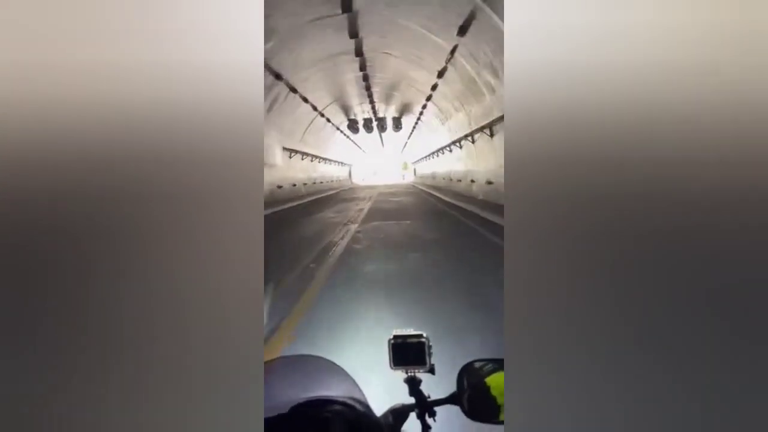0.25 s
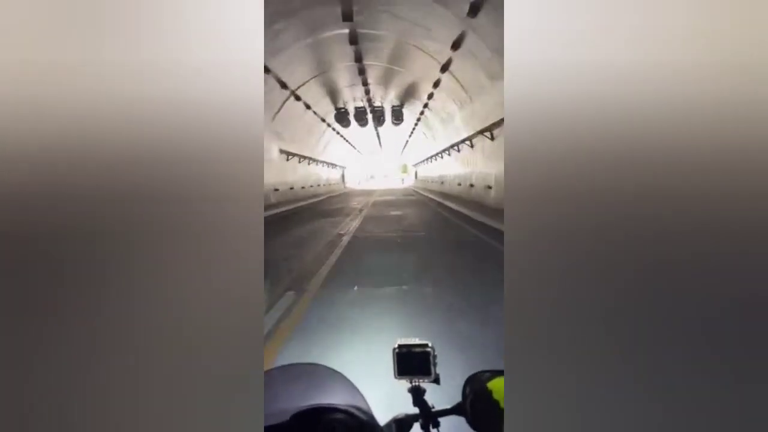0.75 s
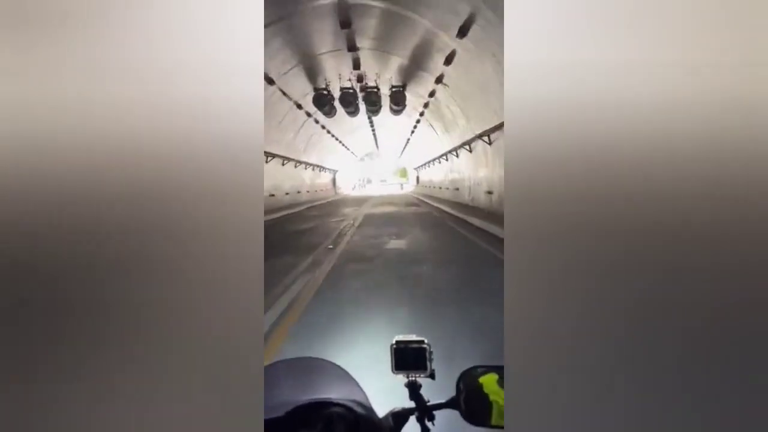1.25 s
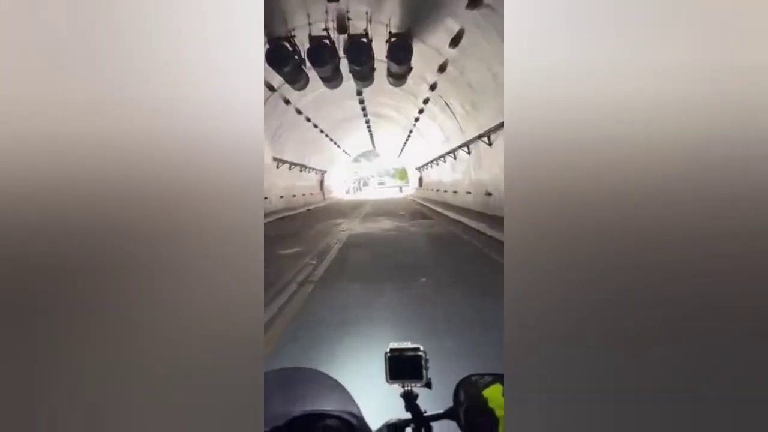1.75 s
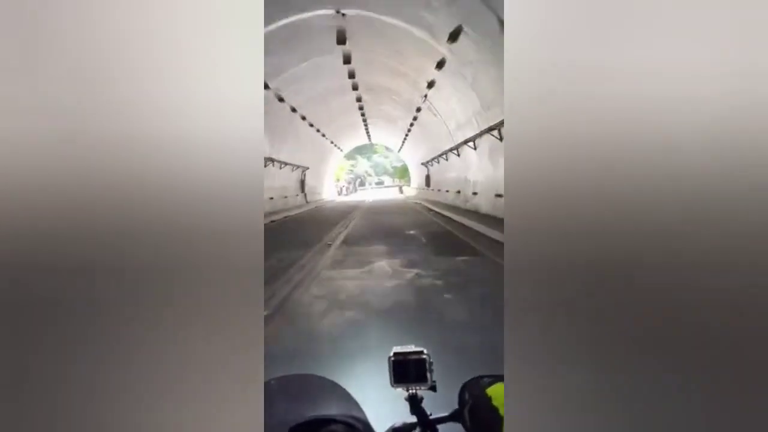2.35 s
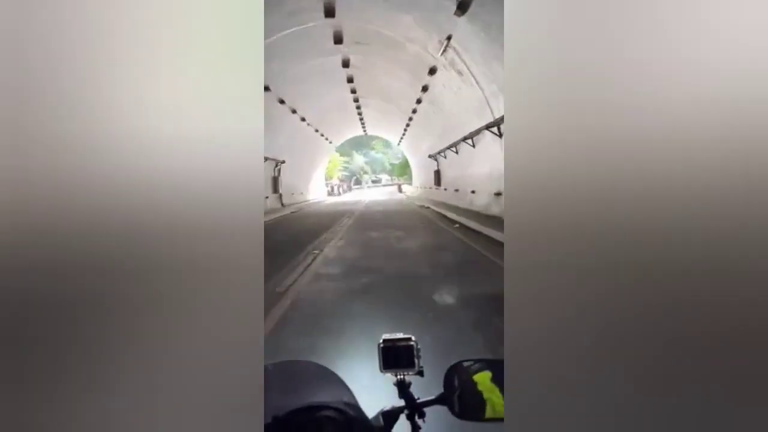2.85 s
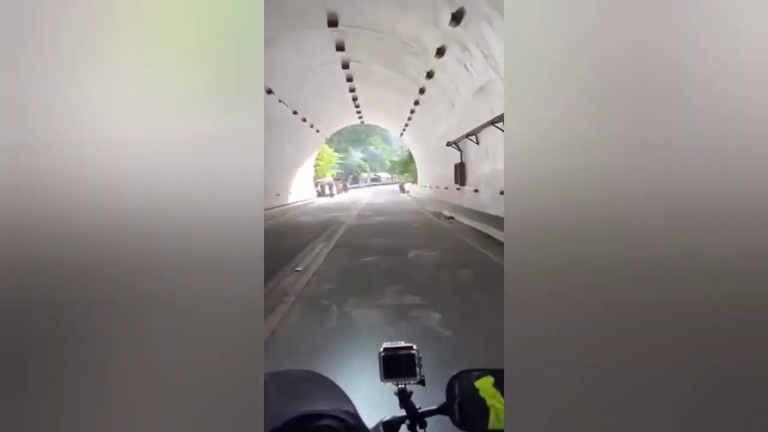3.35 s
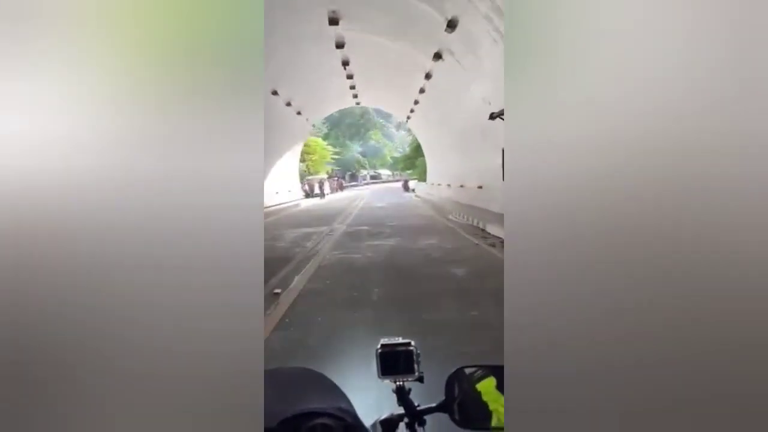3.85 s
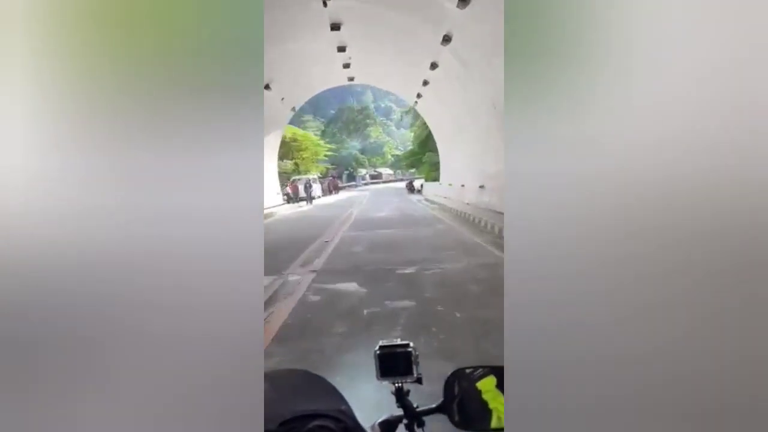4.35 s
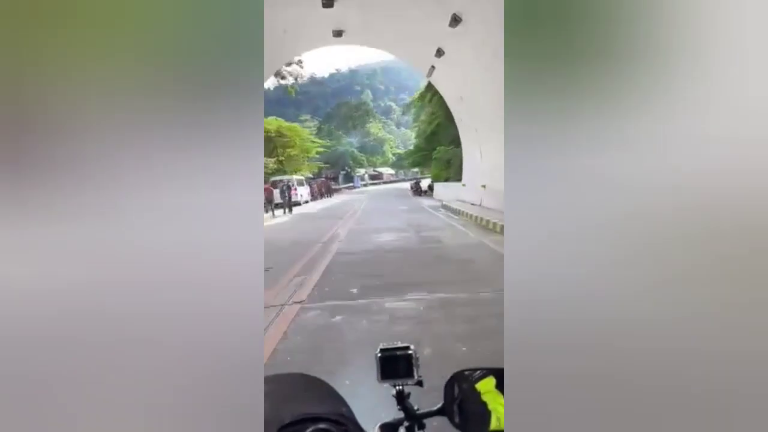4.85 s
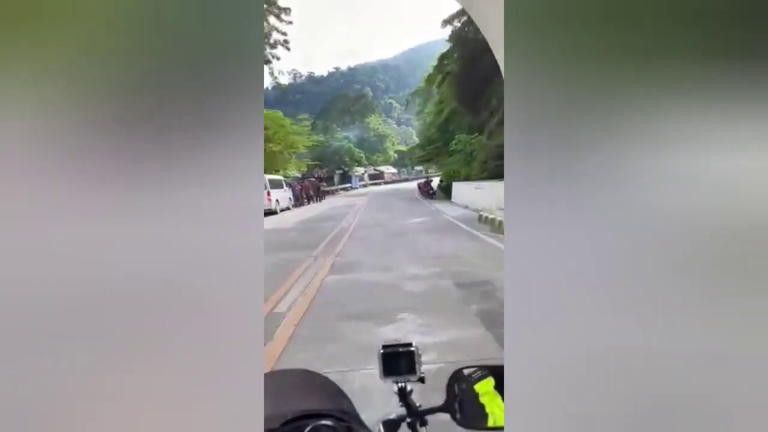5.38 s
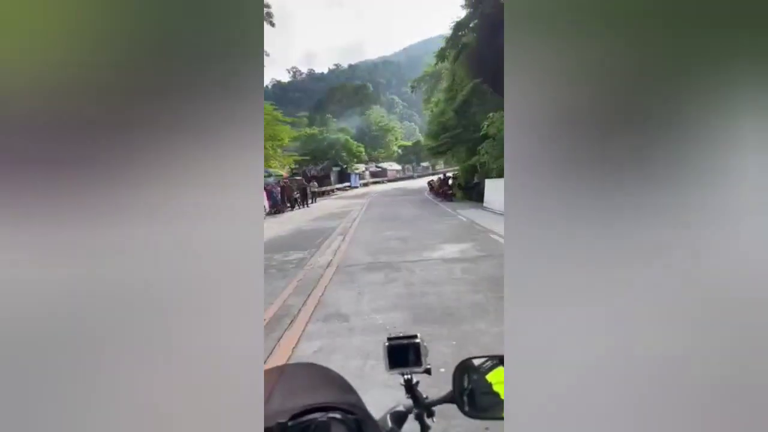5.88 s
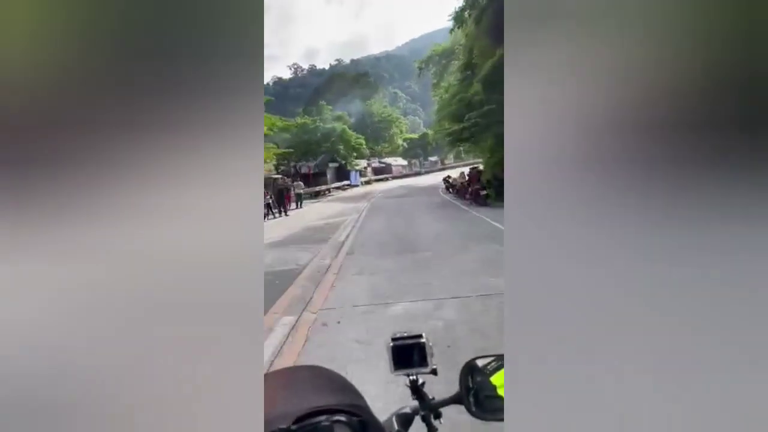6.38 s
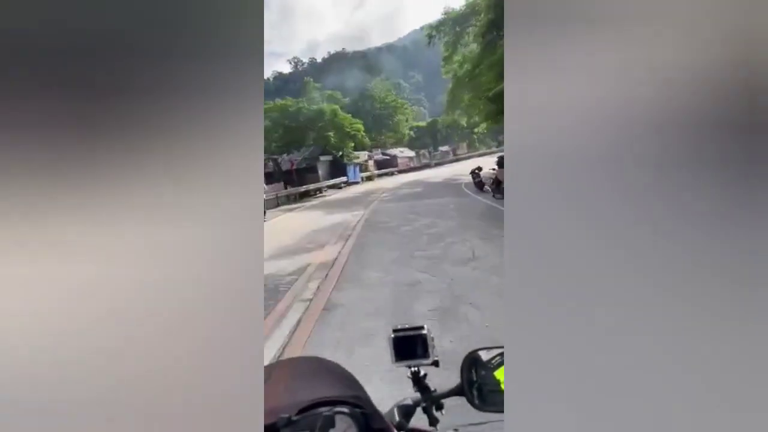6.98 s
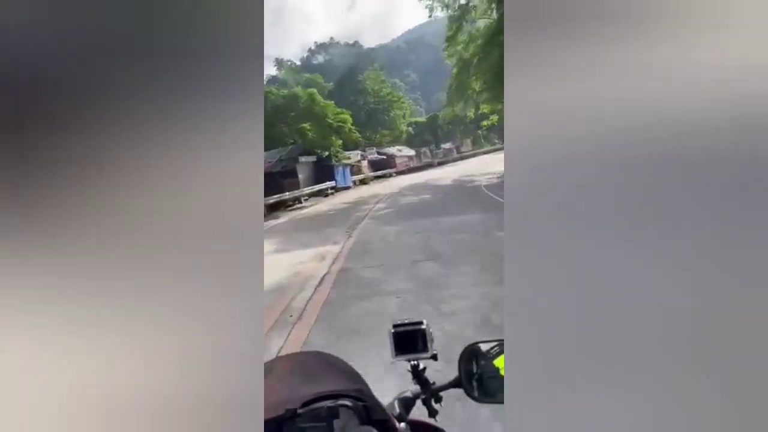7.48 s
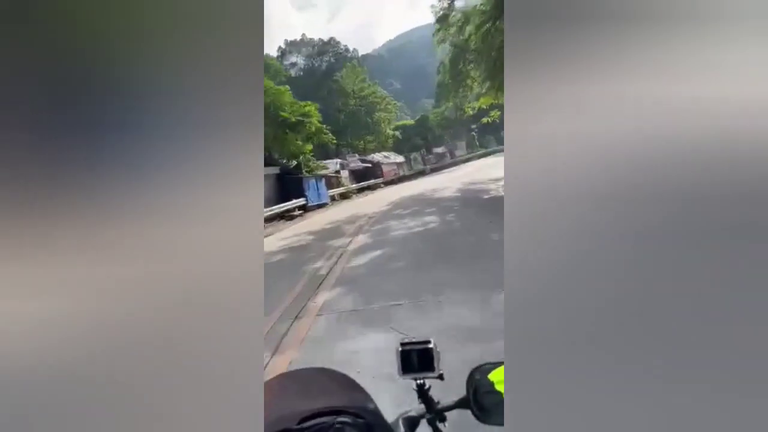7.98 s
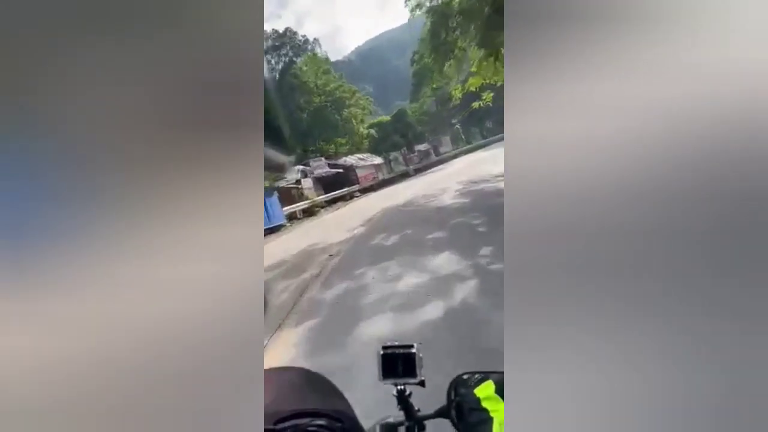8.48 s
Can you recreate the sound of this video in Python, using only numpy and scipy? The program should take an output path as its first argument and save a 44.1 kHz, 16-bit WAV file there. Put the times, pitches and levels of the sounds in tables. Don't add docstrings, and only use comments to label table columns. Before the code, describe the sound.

From the saddle, a motorcycle's high engine howl rings off tunnel walls, falls to quiet wind and rattles, blips, screams again outside, then winds down.

```python
import sys
import numpy as np
from scipy import signal
from scipy.fft import rfft, irfft, next_fast_len
from scipy.io import wavfile
from scipy.ndimage import uniform_filter1d, map_coordinates

SR = 44100
rng = np.random.default_rng(int(sys.argv[2]) if len(sys.argv) > 2 else 0)


def boost(x):
    u = np.asarray(x, float) / 20
    return 10 ** u


def wrap_up_sound(samples):
    columns = np.atleast_2d(samples).T
    tamed = np.clip(columns, -1, 1)
    steps = np.round(tamed * 32767).astype(np.int16)
    wavfile.write(sys.argv[1], SR, steps)


N = 384993

PORTS = np.array([[.5], [-.5]])


def unit(x):
    return x / np.sqrt(np.mean(x ** 2) + 1e-20)


def along(points, hz):
    f, v = np.transpose(points)
    return np.interp(np.log(hz + 1), np.log(f + 1), v)


def curves(rows):
    s, *cols = np.transpose(rows)
    return [np.interp(np.arange(N) / SR, s, c) for c in cols]


def wobble(rate):
    coarse = np.arange(0, N + 64, 64)
    knots = rng.standard_normal(int(N * rate / SR) + 4)
    return np.interp(np.arange(N), coarse, map_coordinates(knots, [coarse * rate / SR]))


def during(spans):
    t = np.arange(N) / SR
    return sum(np.clip((t - a) / .02 + .5, 0, 1) * np.clip((b - t) / .03 + .5, 0, 1) for a, b, *_ in spans)


def span_db(spans):
    return sum(db * during([(a, b)]) for a, b, db in spans)


def bump_db(events):
    return span_db([(s, s + length, db) for s, length, db in events])


def blurred(x, bins, frames):
    return uniform_filter1d(uniform_filter1d(x, size=bins, axis=-2), size=frames, axis=-1)


def filtered(x, response):
    m = 2 * next_fast_len(N // 2 + SR // 4)
    return irfft(rfft(x, m) * response(np.fft.rfftfreq(m, 1 / SR)), m)[..., :N]


def resonance(f, centre_hz, width_hz):
    return 1j * f * width_hz / (centre_hz ** 2 - f * f + 1j * f * width_hz)


def causal(points):
    def response(hz):
        cep = irfft(np.log(boost(along(points, hz))))
        cep[1:len(hz) - 1] *= 2
        cep[len(hz):] = 0
        return np.exp(rfft(cep))
    return response


def tone(order, fired):
    return np.sin(np.pi / 2 * order * fired - np.arctan(order - 4) * 1.6 + .3 * wobble(18))


# pitch_hz, level_db
VOICE = [(120, -10), (215, -15), (300, -7), (380, 4), (490, 0), (640, -10.5), (870, -14), (1700, -28.5)]
# start_s, end_s
THROTTLE = [
    (5.36, 5.71),
    (6.03, 6.635),
]
# start_s, end_s, level_db
NULL = (-1, .33, -14)
# start_s, end_s, level_db
OVERRUN_DULL_DB = [(0, .68, -4.5), (.68, 1.9, -4.5), (7, 7.3, -8.5), (7.68, 8.2, -9.5)]


def firing(hz, fired, effort_db, ragged_db):
    wide = during(THROTTLE)
    dull_db = span_db(OVERRUN_DULL_DB)
    shake_db = np.clip(0.19 * (ragged_db + 19), .6, 4) * wobble(22)
    level_db = effort_db + wide * along(VOICE, hz) + span_db([NULL]) + 4.0 + shake_db
    out = boost(level_db) * tone(4, fired)
    for k in range(2, 5):
        bark_db = along(VOICE, k * hz) + 5 - 4 * (k - 2)
        bark_db = bark_db - (k > 3) * 0.041 * np.maximum(k * hz - 1000, 0)
        muffled_db = -0.0348 * (k - 1) * hz - 9 * (k > 2) + dull_db
        shake_db = 2.5 + np.clip(0.22 * (ragged_db + 30.5), 1.5, 5) * wobble(35)
        out += boost(effort_db + wide * bark_db + (1 - wide) * muffled_db + shake_db) * tone(4 * k, fired)
    return out


# start_s, end_s, cycle_tones_db
LIMITER = [
    (-1, .72, -21),
    (6.662, 7.36, -16.5),
]
# cycle_multiple, level_db
CYCLE_IN = [(1, -21.5), (2, -12.5), (3, -12.5), (4, 0), (5, -11.5), (6, -21), (7, -19.5), (8, -14),
            (9, -23.5), (10, -26.5), (11, -37), (12, -28), (13, -29.5), (14, -46.5), (15, -54)]
# cycle_multiple, level_db
CYCLE_OUT = [(1, -8.5), (2, -24), (3, -9.5), (4, 0), (5, -10.5), (6, -16.5), (7, -25), (8, -22), (9, -20),
             (10, -43.5), (11, -42.5), (12, -34), (13, -47.5), (14, -56), (15, -49.5)]


def uneven_cylinders(fired, effort_db):
    inside = np.arange(N) < 3 * SR
    uneven = boost(effort_db - 23) + sum(boost(db) * during([(a, b)]) for a, b, db in LIMITER)
    out = np.zeros(N)
    for (order, in_db), (_, out_db) in zip(CYCLE_IN, CYCLE_OUT):
        if order % 4:
            out += uneven * boost(np.where(inside, in_db, out_db) + 3 + 2.2 * wobble(16)) * tone(order, fired)
    return out


# cycle_multiple, start_s,
# end_s, level_db
PASSING_TONES = [(4, 8, 8.8, -36), (4, 0.1, 0.15, -24.5), (2, -2, .2, -24.5), (5, .17, 0.32, -26),
                 (2, 6.43, 7.3, -28), (5, 6.5, 6.65, -22), (6, 10, 7.58, -37), (8, 5, 7.46, -38.5),
                 (6, 7.5, 7.83, -35), (8, 7.92, 8.12, -38), (12, 7, 7.75, -40), (2, 8.5, 9.7, -36),
                 (8, 8.5, 8.8, -34), (8, 5.5, 2.1, -43), (8, 3, 3.3, -36), (8, 5, 3.23, -48),
                 (12, 4.5, 3.25, -45), (4, -1, 2.1, -55)]


def passing_tones(fired, ragged_db):
    out = sum(boost(db) * during([(a, b)]) * np.sin(np.pi / 2 * int(order + .5) * fired)
              for order, a, b, db in PASSING_TONES)
    return out * boost(.03 * ragged_db)


# pitch_hz, level_db
PIPE = [(40, -52), (120, -9), (240, 2.5), (350, 5), (470, 4.5), (620, 4.5), (900, -7), (1150, -14),
        (1500, -34.5), (4000, -55)]


def rasp(hz, fired):
    at = np.flatnonzero(np.diff(np.floor(fired)))
    pulses = np.zeros(N)
    pulses[at] = rng.standard_normal(4000)[:len(at)] * np.sqrt(SR / hz[at])
    turbulence = .8
    mixed = np.sqrt(1 - turbulence) * pulses + np.sqrt(turbulence) * rng.standard_normal(N)
    return unit(filtered(mixed, causal(PIPE)))


# cycle_multiple, level_db
GEARS = [(17, -40), (18, -39), (20, -37), (21, -39), (22, -38), (24, -37), (25, -33), (26, -33), (28, -37),
         (29, -37), (30, -38), (32, -37), (34, -39)]


def gears(fired, speed_db):
    whine_db = -41 + 11 * np.minimum(speed_db, -.4) + 6.0 + 1.0 * wobble(24)
    out = boost(whine_db) * tone(16, fired)
    revs_db = 4.75 * speed_db
    return out + sum(boost(db + revs_db - 13.5 + 3 * wobble(12)) * tone(order, fired) for order, db in GEARS)


# start_s, firing_rate_hz, effort_db, raggedness_db (relative to the effort) # held
HELD = [(0, 454.6, -18.5, -10.5), (.11, 466.5, -18, -9), (.4, 458.3, -18.5, -11),
        (.66, 455.1, -18.5, -12.5), (.75, 410, -16.5, -6), (.89, 367.6, -19, -6), (1.0, 325, -20, -10.5),
        (1.14, 232.9, -32.5, -6), (1.4, 169.5, -45, 8.5)]
ROLLING = [(1.8, 123.3, -57, 13.5), (2.2, 115.2, -59, 6), (2.67, 121.6, -44, 0), (3.191, 124.6, -40, -6),
           (3.299, 119.4, -48.5, 0), (4.63, 115.7, -46.5, 0.5), (5.279, 104.4, -50, 6.5)]
BLIP = [(5.376, 130.1, -32, -2), (5.45, 170.5, -34, 5), (5.562, 212.9, -23, -1), (5.68, 251.9, -23.5, 0.5),
        (5.759, 247.4, -28.5, 3.5), (5.914, 228.9, -26, -1), (6.009, 199.7, -35.5, 9)]
CLIMB = [(6.056, 216.3, -26.5, 1), (6.204, 283.8, -19.5, 0.5), (6.35, 369.3, -15.5, -4.5),
         (6.462, 431.2, -15.5, -20.5), (6.53, 463, -15, -17), (6.629, 494.5, -11, -17),
         (6.679, 487.5, -16, -1), (6.75, 484, -14.5, -9.5), (7.34, 475, -22.5, -7.5)]
FALL = [(7.38, 457.3, -24, -9.5), (7.48, 388.3, -19, -19), (7.59, 311.1, -32, -5), (7.672, 269, -30.5, -13),
        (7.786, 234, -29.5, -12), (8.022, 190.9, -40, -30), (8.34, 152.4, -46, -6), (8.73, 126.2, -46, -12)]


def engine():
    hz, effort_db, ragged_db = curves(HELD + ROLLING + BLIP + CLIMB + FALL)
    hz = uniform_filter1d(hz, size=1500)
    fired = np.cumsum(hz) / SR
    speed_db = 20 * np.log10(hz / 480)
    out = firing(hz, fired, effort_db, ragged_db)
    out += uneven_cylinders(fired, effort_db) + passing_tones(fired, ragged_db) + gears(fired, speed_db)
    out += boost(effort_db + ragged_db + 0.81 * wobble(12)) * rasp(hz, fired)
    load_db = uniform_filter1d(effort_db, size=7000) + 15.0
    return out, fired, load_db, speed_db


# start_s, peak_db
STUMBLES = [(0.69, -12), (0.758, -7.5), (0.807, -14), (0.848, -13), (0.888, -10.5), (0.92, -18),
            (0.951, -9), (1.07, -15.5), (1.129, -13.5), (1.174, -23.5), (1.198, -28.5), (1.231, -17),
            (1.33, -30.5), (1.384, -25), (1.436, -21)]


def stumble(load_db):
    t = np.arange(2 * SR) / SR
    rise_s, fall_s = 0.0054, 0.017
    puffs = np.zeros(len(t))
    for s, db in STUMBLES:
        slope_s = np.where(t < s + rise_s, rise_s, fall_s)
        puffs += boost(db) * np.exp(-((t - s - rise_s) / slope_s) ** 2)
    puffs = np.pad(puffs, (0, N - len(t))) * boost(6.0 - load_db)
    return 1 + during([(.68, 1.3)]) * (0.48 - 1 + 0.67 * np.minimum(puffs, 1.5))


# pitch_hz, t60_s
TUNNEL = [(100, 6), (350, 1.6), (700, 4.17), (1200, 10.3), (2500, 3.8), (8000, 0.84)]
# start_s, level_db
WALLS = [(0, -5.5), (.7, -1), (1.2, -10.5), (5, -13), (5.7, -8), (6.1, -6), (6.5, -37), (8.73, -7.5)]
# pitch_hz, left_right_likeness
ECHO_ALIKE = [(60, 0.86), (170, 0.34), (350, 0.54), (520, -0.58), (750, -1.035), (1100, -0.59),
              (1600, -0.59), (3000, -1.3)]
# pitch_hz, width_hz, level_db
CROSS = [(243, 15, 2.5), (344.3, 35, 7), (574.6, 7.9, 8.5)]


def tunnel(x):
    hz, t, z = signal.stft(rng.standard_normal((2, 2 * SR)), SR, nperseg=256)
    turn = np.arccos(np.clip(along(ECHO_ALIKE, hz), -1, 1))[:, None] / 2
    mid, side = np.cos(turn) * z[0], np.sin(turn) * z[1]
    decay = boost(-60 * t / along(TUNNEL, hz)[:, None])
    tail = signal.istft(np.array([mid + side, mid - side]) * decay, SR, nperseg=256)[1]
    x = x * (0.43 + 0.62 * wobble(60))
    held = np.concatenate([x[:SR // 2], x[:SR // 2], x])
    sent = held * boost(np.pad(curves(WALLS)[0], (SR, 0), "edge"))
    echo = signal.fftconvolve(sent[None], tail / np.linalg.norm(tail[0]), axes=1)[:, SR - 700:][:, :N]
    behind = np.interp(np.arange(N) / SR, [3.5, 5], [0, .75])
    echo = echo + behind * (echo.mean(axis=0) - echo)
    echo = echo * boost(3.0 * wobble(14) - 1.0)
    return filtered(echo, lambda f: 1 + sum(boost(db) * resonance(f, c, w) for c, w, db in CROSS))


def mouth(load_db):
    def arch(f):
        modes = [(232, 14, -9), (350, 26, -3)]  # Hz, width Hz, dB
        hum = sum(boost(db) * np.sqrt(SR / np.pi / w) * resonance(f, c, w) for c, w, db in modes)
        return hum / (1 + (f / 650) ** 4)
    ring = filtered(rng.standard_normal(N), arch)
    return ring * during([(5.5, 6.26)]) * boost(0.49 * load_db - 16.5)


# pitch_hz, left_right_likeness
ALIKE = [(60, 1), (350, 0.97), (550, 0.85), (850, 0.53), (1300, 0.33), (1900, 0.44), (3000, 0.014),
         (5500, -0.0035), (7000, 0.79), (9000, 0.53), (11000, 0.47)]


def rush(spectrum, lo_hz, hi_hz, patchy_db, alike=ALIKE):
    z = signal.stft(rng.standard_normal((2, N + 512), dtype=np.float32), nperseg=512)[2]
    field = blurred(rng.standard_normal(z.shape[1:]), 5, 8)
    pair = signal.istft(z * boost(patchy_db * unit(field)), nperseg=512)[1][:, :N]

    def spread(hz):
        edges = np.sqrt((1 + (lo_hz / (hz + 1)) ** 6) * (1 + (hz / hi_hz) ** 6))
        turn = np.arccos(np.clip(along(alike, hz), -1, 1)) / 2
        return boost(along(spectrum, hz)) / edges / (1 + (hz / 11400) ** 16) * [np.cos(turn), np.sin(turn)]
    mid, side = filtered(pair, spread)
    return unit(np.array([mid + side, mid - side]))


# pitch_hz, level_db_per_hz
BUFFET = [(12, -52), (20, -28.5), (75, 2), (222, -9), (259, -11), (330, -14), (397, -7.5), (420, -21),
          (600, -14.5), (780, -15), (1320, -120)]
# start_s, length_s, level_db
SWELLS = [(.76, 0.32, 5), (1.122, .22, 1), (1.4, 0.11, 5), (1.952, 0.11, -2), (2.51, 0.39, -4),
          (3.306, 0.24, 5), (4.895, 0.088, 2), (5.498, .2, 2.5), (6.197, 0.073, 5), (6.845, 0.42, -2.5),
          (7.75, .3, 1), (8.206, .22, 3.5)]
# times_s, then offsets_db added to the load; sooner in the open
DUCK_FROM = ([1.2, 6.2, 7.3], [6, 6, 17])


def thumps(load_db):
    t = np.arange(N) / SR
    limited = during(LIMITER)
    excess_db = np.clip(uniform_filter1d(load_db, size=9000) + np.interp(t, *DUCK_FROM), 0, 12)
    duck_db = -1.5 * (1 - limited) * excess_db
    buffet = np.hypot(boost(-44.5 + 1.7 * (t - 1.5) + duck_db), boost(-41) * limited)
    swell_db = 1.5 + bump_db(SWELLS) + 0.59 * wobble(16) + wobble(6.7)
    return buffet * boost(swell_db) * rush(BUFFET, 25, 500, patchy_db=1.0)


# pitch_hz, level_db_per_hz
RUSH = [(180, -25), (300, -9), (378, -4.5), (420, -5.5), (537, -27.5), (617, -10.5), (719, -8), (2140, -14),
        (4260, -22.5), (4890, -26), (5700, -25.5), (8240, -31.5), (11700, -28.5), (15200, -69.5),
        (22000, -120)]
# start_s, level_db
WIND = [(0, -47.5), (1.9, -49.5), (2.05, -54.5), (2.4, -54), (2.9, -53), (3.32, -51.5), (3.7, -54),
        (4.37, -49.5), (4.4, -57.5), (4.85, -50.5), (4.98, -52), (5.03, -57.5), (5.3, -59), (5.6, -48),
        (7.5, -60), (8.14, -105), (8.73, -103)]
# start_s, length_s, level_db
GUSTS = [(1.308, 0.12, 1.5), (2.068, 0.076, 6), (2.224, 0.049, 6.5), (2.326, 0.15, 5), (2.493, 0.063, 5.5),
         (3.292, 0.15, 3), (3.941, 0.071, 2), (4.12, 0.051, 3.5), (4.47, 0.043, 4), (4.82, 0.17, 1),
         (5.319, .1, 3), (5.448, 0.12, -3.5), (5.715, 0.12, -0.5), (5.883, 0.056, 2.5), (5.932, 0.12, -1)]
# start_s, length_s, level_db
SLAPS = [(8.18, 0.037, -57.5), (8.237, 0.24, -52.5), (8.252, 0.016, -56), (8.377, 0.018, -59),
         (8.646, .12, -56)]


def air(fired, load_db, speed_db):
    puff_db = bump_db(GUSTS) - 1.5
    squall = sum(boost(db) * during([(s, s + length)]) for s, length, db in SLAPS)
    steady = boost(curves(WIND)[0])
    lull_db = -20 * np.interp(np.arange(N) / SR, (2.0, 2.35, 3.0), [0, 1, 0])
    gust = wobble(7) + 1.5 * wobble(15)
    cycle = 1 + 0.12 * np.cos(2 * np.pi * fired / 4)

    def wind_db(squall_db):
        return 20 * np.log10(steady + squall * boost(squall_db)) + 55 + puff_db

    def level(blown_db, limiter_db, per_effort, per_revs, over_db, per_gust):
        driven_db = limiter_db + per_effort * load_db + per_revs * speed_db + .5 * gust + 0.49 * puff_db
        return np.hypot(boost(driven_db), boost(over_db - 55.5 + per_gust * blown_db))

    roar = level(wind_db(10.5) + lull_db + 0.51 * gust,
                 limiter_db=-31.5, per_effort=0.75, per_revs=1.5, over_db=4.5, per_gust=0.62)
    roar = roar * boost(1.0) * rush(RUSH, 390, 1170, patchy_db=1.0)
    clatter = level(wind_db(0) + 0.063 * lull_db + 0.44 * gust,
                    limiter_db=-48, per_effort=0.85, per_revs=-0.5, over_db=0.5, per_gust=1.47)
    clatter = clatter * boost(5.5) * cycle * rush(RUSH, 994, 5100, patchy_db=4.0)
    hiss = level(wind_db(-18.5) + 2.6 * gust,
                 limiter_db=-41, per_effort=0.98, per_revs=1.17, over_db=-12, per_gust=0.53)
    hiss = hiss * boost(7.5 + 0.64 * wobble(30)) * cycle * rush(RUSH, 3170, 9640, patchy_db=2.5)
    return roar + clatter + hiss


def cracks(events, colour, t60):
    out, t = np.zeros((2, N + SR)), np.arange(SR // 20) / SR
    for s, db in events:
        crack = rng.standard_normal(len(t)) * boost(-60 * t / t60)
        out[:, round(s * SR):][:, :len(t)] += boost(db) * crack
    return filtered(out[:, :N], causal(colour))


# start_s, peak_db
TICKS = [(1.146, -31.5), (1.388, -34.5), (1.6184, -43.5), (1.9155, -36), (2.1132, -41), (2.252, -41),
         (2.3387, -39), (2.4125, -34), (2.4354, -34.5), (2.5152, -46.5), (2.942, -38), (3.0425, -38),
         (3.1068, -40.5), (3.1901, -51), (3.219, -38), (3.245, -45), (3.4106, -41.5), (3.909, -48),
         (3.9958, -54), (4.124, -39.5), (4.2169, -42), (4.2457, -38.5), (4.2817, -34), (4.363, -33),
         (4.3714, -41.5), (4.4887, -38), (4.5231, -47), (4.558, -40), (4.6179, -38.5), (4.7463, -38),
         (4.8058, -41), (4.8114, -44), (4.831, -38.5), (4.847, -28), (4.8614, -33.5), (4.8762, -32),
         (4.8894, -41.5), (4.9142, -33), (4.9255, -33), (4.9383, -39), (4.9524, -41), (5.0285, -49),
         (5.0569, -39), (5.1831, -42.5), (5.3423, -37.5), (5.3707, -49.5), (5.391, -39), (5.4154, -42.5),
         (5.7848, -34), (5.81, -33), (5.9007, -39.5), (5.913, -36.5), (6.027, -39)]
# start_s, peak_db
SNAP = [(2.4138, -19.5)]
# start_s, peak_db
PUFFS = [(2.093, -28), (2.332, -30), (3.8, -28), (3.985, -24), (4.117, -26), (4.282, -23.5), (5.173, -39.5),
         (5.286, -40), (8.064, -56), (8.103, -47), (8.304, -26), (8.52, -62), (8.549, -54), (8.61, -53)]


def ticks():
    plastic = [(300, -7.5), (1500, 2.5), (4000, 4.5), (7000, 0.5), (10000, -8), (14000, -13)]
    chip = [(1000, -19), (3000, -1), (5000, 1), (7000, 3), (11000, -9), (15000, -16)]
    slap = [(100, 15), (700, 4.5), (2000, -3.5), (5000, -29.0), (12000, -33.5)]
    rattles = boost(1.5) * cracks(TICKS, plastic, t60=0.011)
    return rattles + cracks(SNAP, chip, t60=0.0037) + cracks(PUFFS, slap, t60=0.032)


def verges():
    level_db = np.interp(np.arange(N) / SR, [7.4, 7.75, 8.2], [-50, -51, -53]) + 0.89 * wobble(4.9)
    return boost(level_db) * rush(RUSH, 610, 1400, patchy_db=7.5, alike=[(400, -0.68), (1000, -0.88)])


# pitch_hz, left_minus_right_db
LEAN = [(500, 0), (800, 2.5), (1050, 5), (1400, 1.5), (2300, 0), (3400, -3), (4300, 2), (6000, 0)]
# start_s, left_minus_right_db
LEFTWARD = [(0, 1), (.45, 1.5), (.9, 0), (1.4, 0)]


def scene():
    exhaust, fired, load_db, speed_db = engine()
    direct = filtered(exhaust * stumble(load_db), lambda hz: boost(PORTS * along(LEAN, hz)))
    around = tunnel(exhaust) + mouth(load_db) + thumps(load_db) + air(fired, load_db, speed_db)
    return boost(PORTS * curves(LEFTWARD)[0]) * (direct + around + ticks() + verges())


# pitch_hz, side_lift_db
WIDTH = [(300, 0), (700, 1.5), (1300, 2), (2400, 1.5), (4000, -.5), (8000, 0), (11500, 2)]
# pitch_hz, level_db
GATE = [(300, -8), (700, -4), (1400, -4), (2600, -8), (4350, -9), (4650, 4), (5250, 5), (5600, -10),
        (9600, -13), (10200, 5)]
# pitch_hz, level_db
NARROW = [(60, -17), (800, -11), (1100, -20), (3000, -30)]


def dropouts(left, right):
    hz, _, z = signal.stft(np.array([left + right, left - right]) / 2, SR, nperseg=1024)
    z[1] *= boost(along(WIDTH, hz))[:, None]
    power = abs(blurred(abs(z) ** 2, 5, 3)) + 1e-20
    total = power.sum(axis=(0, 1))
    loud = total / (total + boost(-56))
    f = hz[:, None]
    flicker_db = 3.5 * unit(blurred(rng.standard_normal(z.shape[1:]), 9, 3))
    flicker_db -= loud * (2.5 * (f < 3000) + 8 * (abs(f - 5000) < 1000))
    z[0] /= 1 + (boost(2 * along(GATE, f) + 2 * flicker_db) * power[1] / power[0]) ** 8
    attack = np.maximum(np.gradient(np.log(power[0, hz > 6000].sum(axis=0))), 0)
    opening = uniform_filter1d(rng.standard_normal(z.shape[2]), size=3) * np.sqrt(3) + 3 * attack
    opening -= .15 * loud
    z[0, hz > 10150] *= opening > .45
    z[0] *= (f < 9300) | (flicker_db / 3.5 + opening + .8 * loud > -.6)
    z[1] /= 1 + (boost(2 * along(NARROW, f) + flicker_db) * power[0] / power[1]) ** 4
    return signal.istft(z, SR, nperseg=1024)[1][:, :N]


# pitch_hz, left_lead_radians
LEAD = [(700, 0), (1100, .4), (1900, .4), (2300, -.9), (2800, -2.2), (3500, -2.1), (4400, -.9), (5500, 0)]


def roll_off(x):
    return signal.sosfilt(signal.butter(12, 11870, fs=SR, output="sos"), x)


def record(dry):
    ceiling = .72
    dry = dry / (1 + abs(dry / ceiling) ** 4) ** (1 / 4)
    left, right = filtered(dry, lambda hz: np.exp(1j * PORTS * along(LEAD, hz)))
    mid, side = dropouts(left, right)
    return roll_off(np.array([mid + side, mid - side]))


dry = scene()
out = record(dry)
wrap_up_sound(out)
```